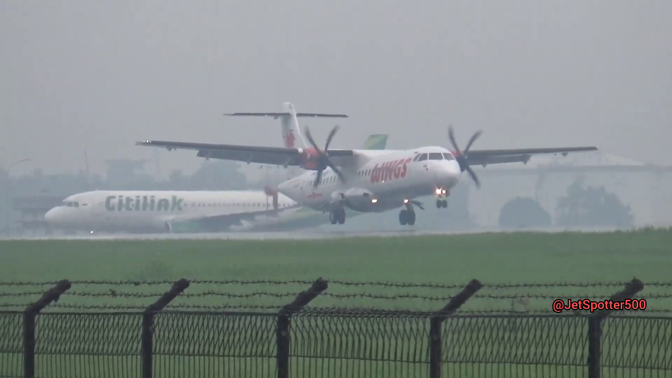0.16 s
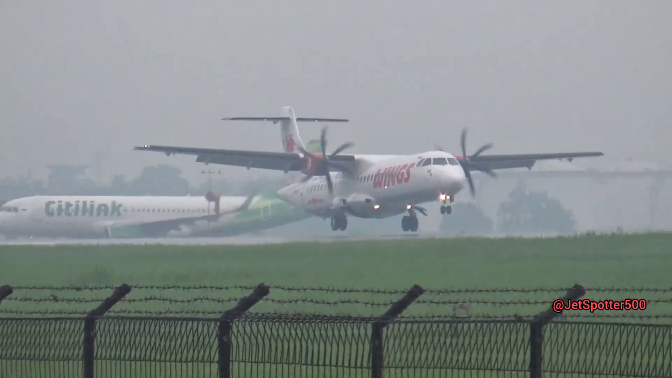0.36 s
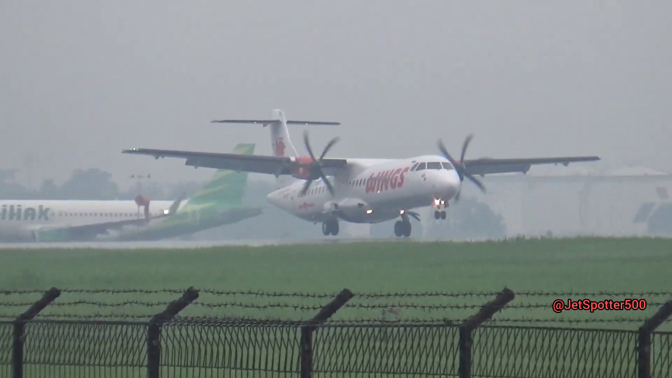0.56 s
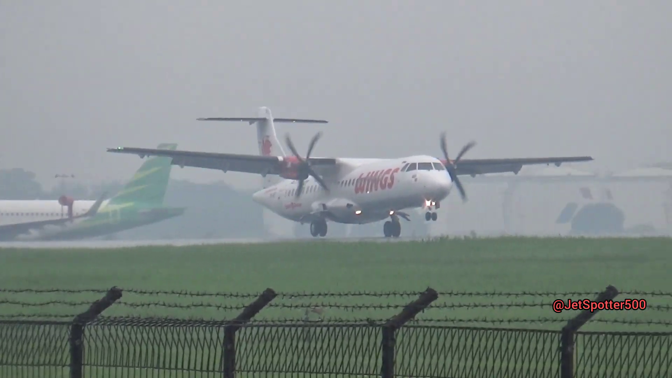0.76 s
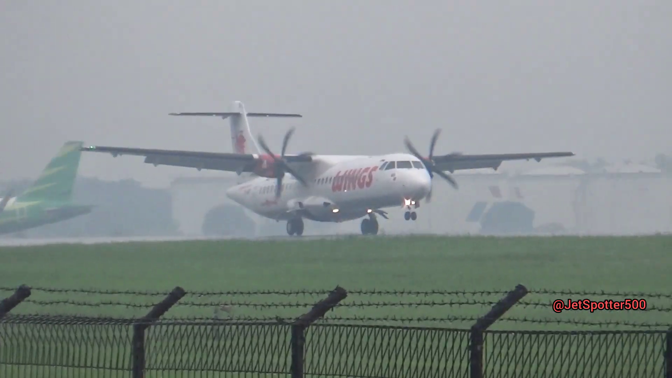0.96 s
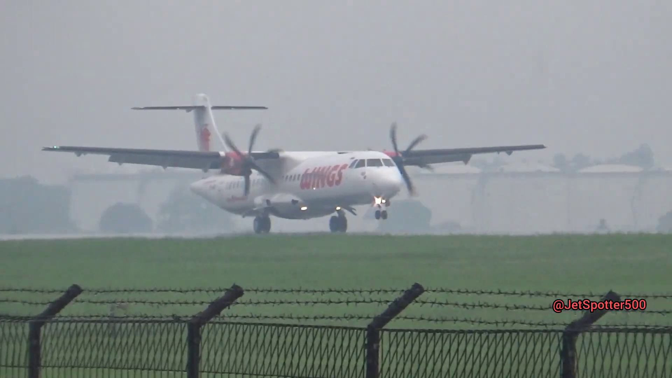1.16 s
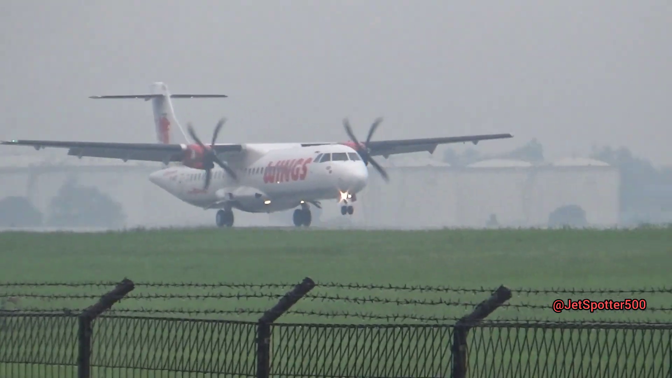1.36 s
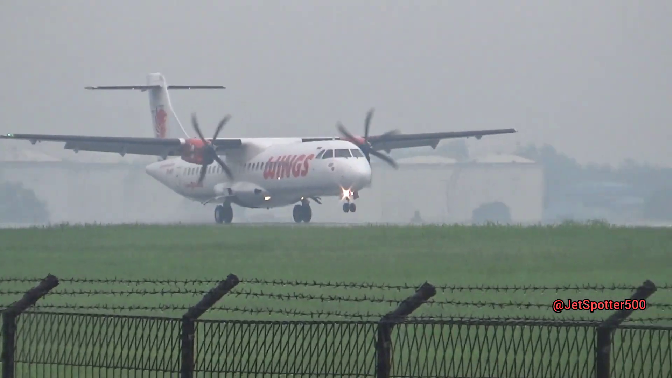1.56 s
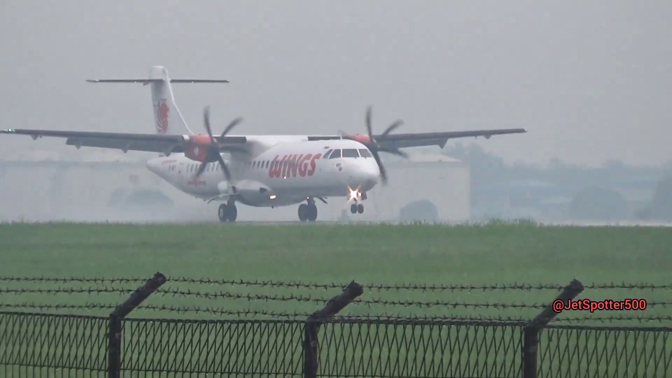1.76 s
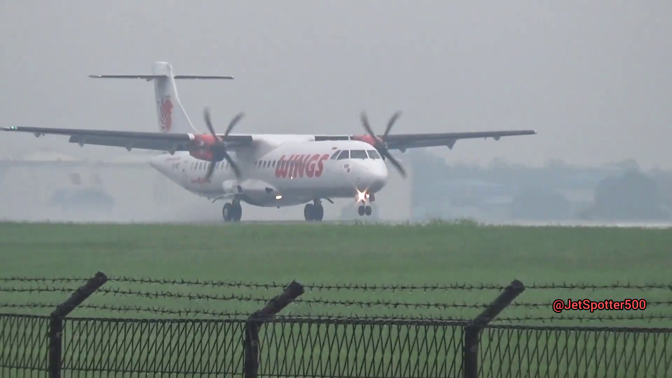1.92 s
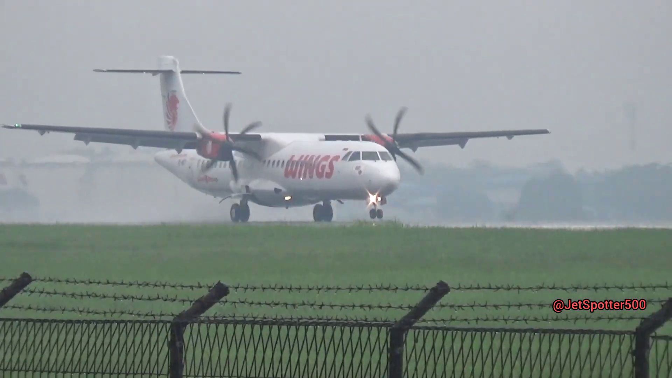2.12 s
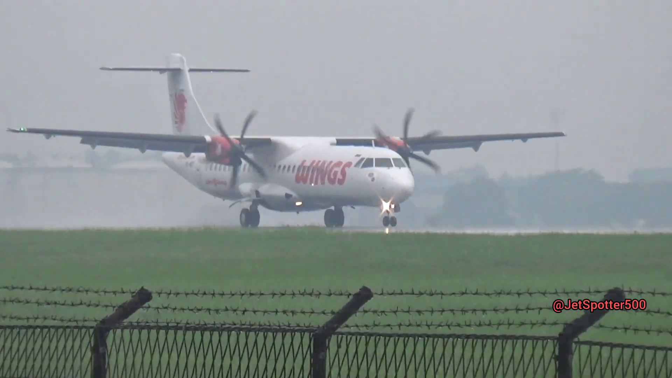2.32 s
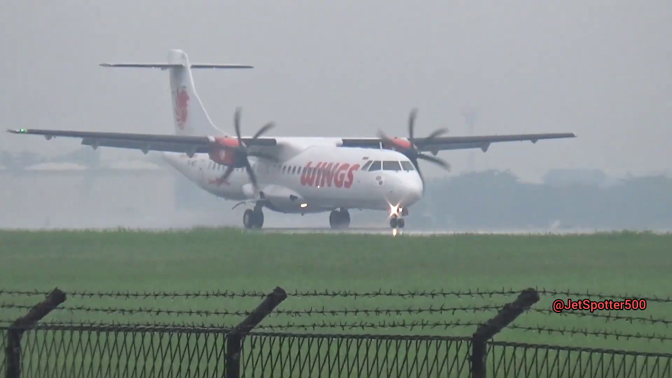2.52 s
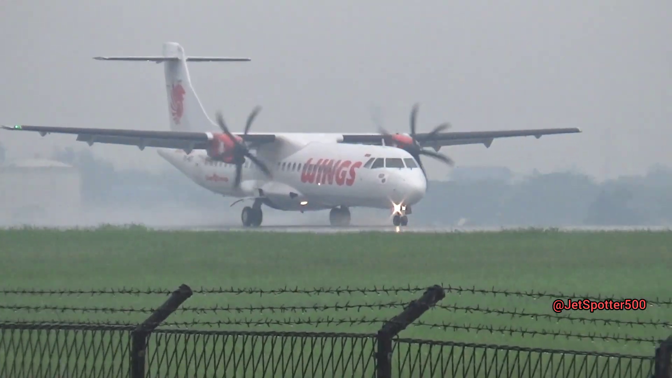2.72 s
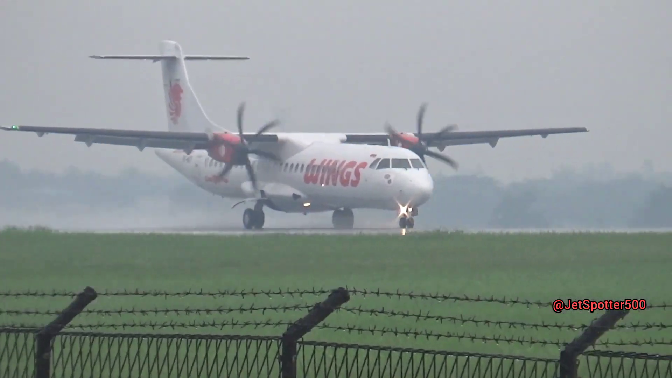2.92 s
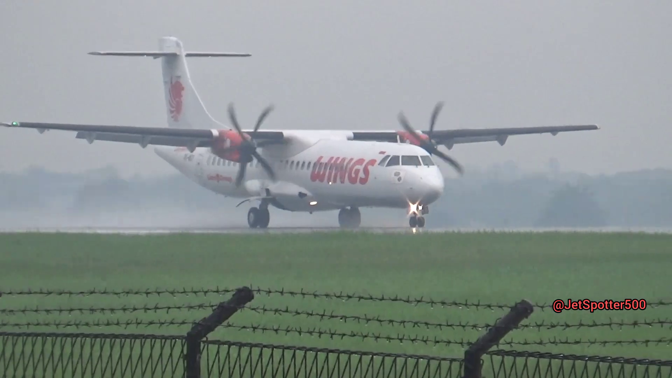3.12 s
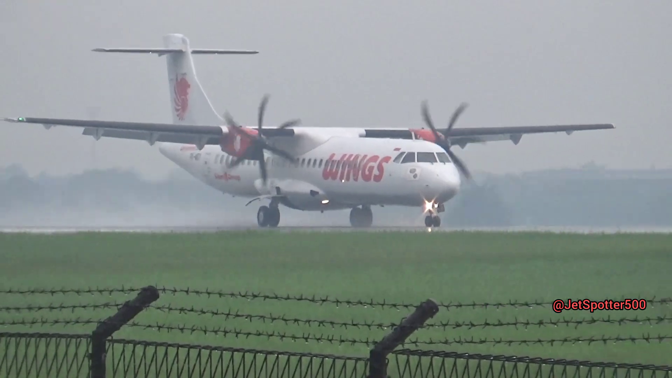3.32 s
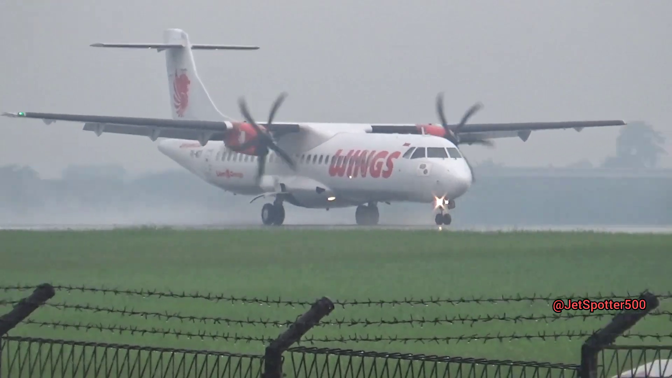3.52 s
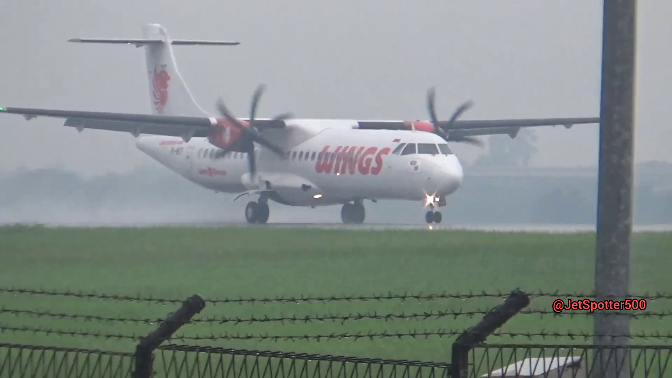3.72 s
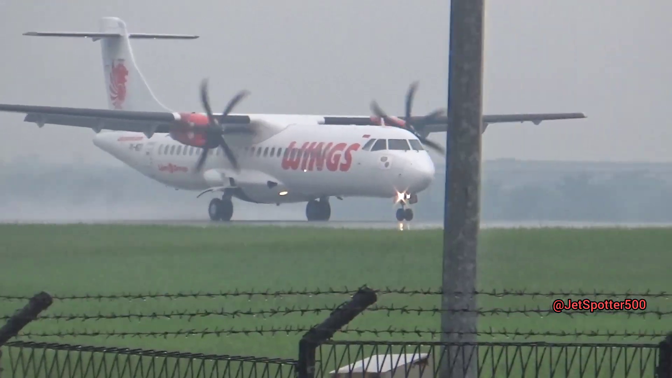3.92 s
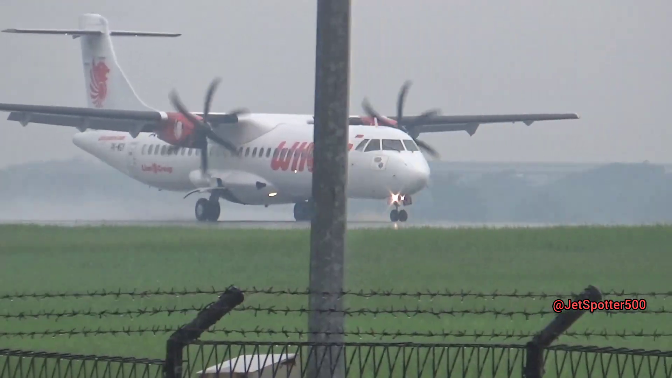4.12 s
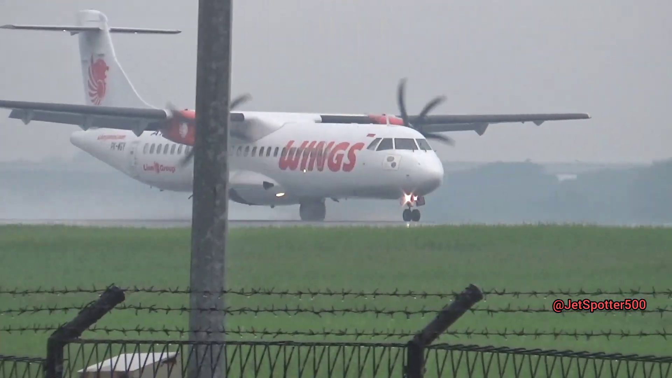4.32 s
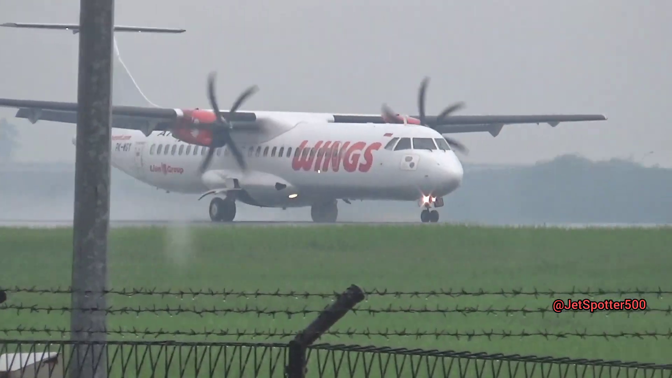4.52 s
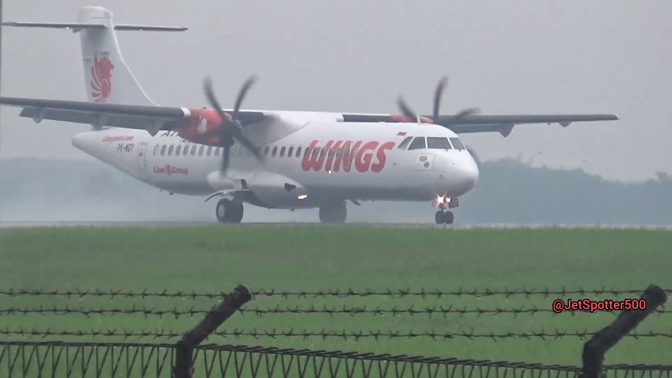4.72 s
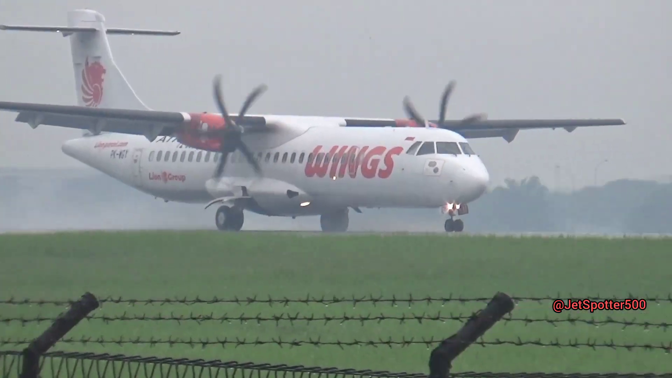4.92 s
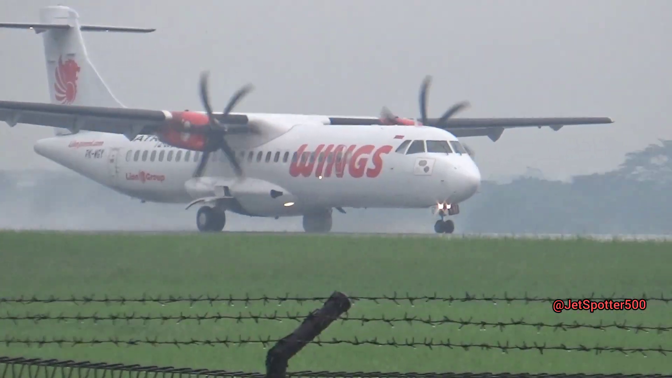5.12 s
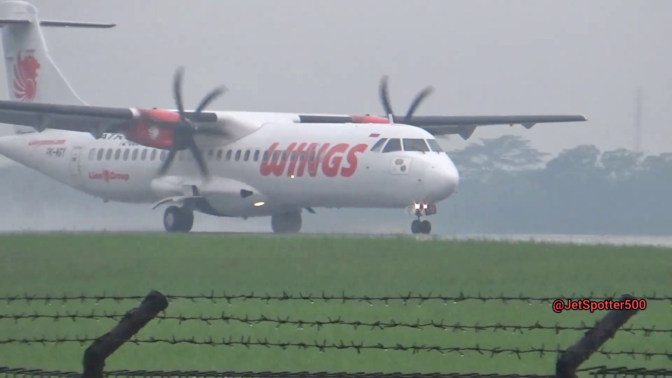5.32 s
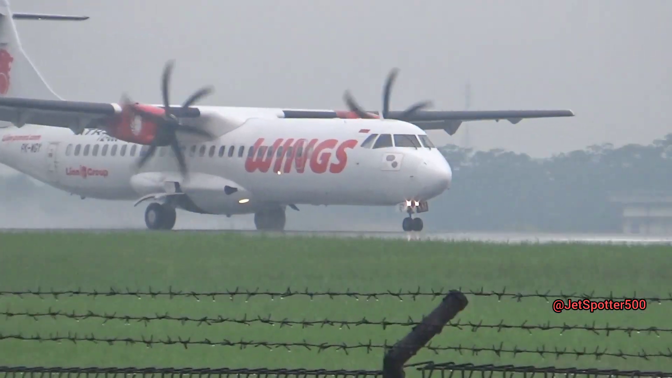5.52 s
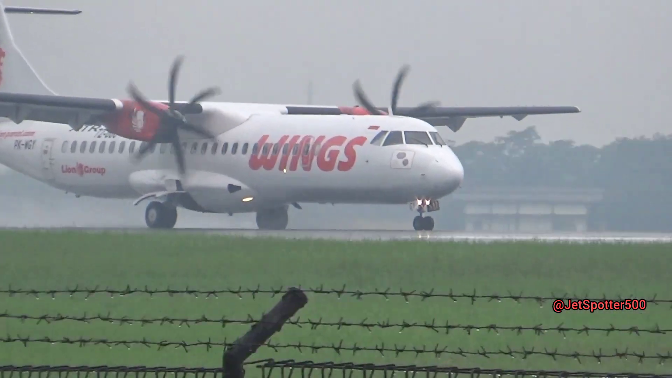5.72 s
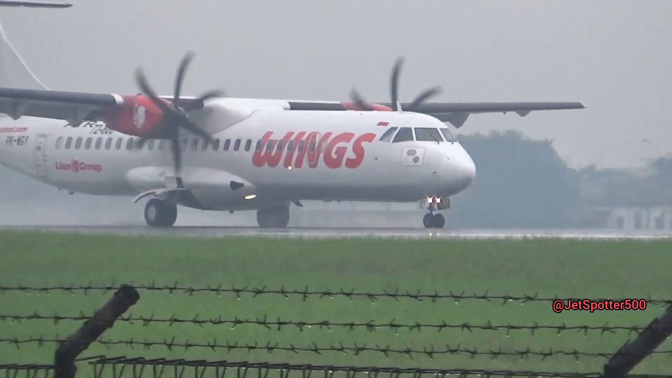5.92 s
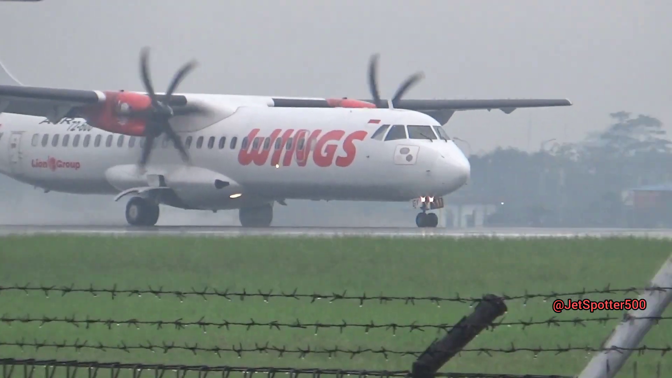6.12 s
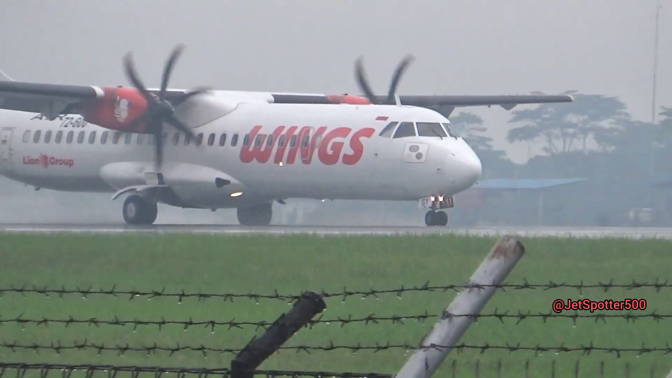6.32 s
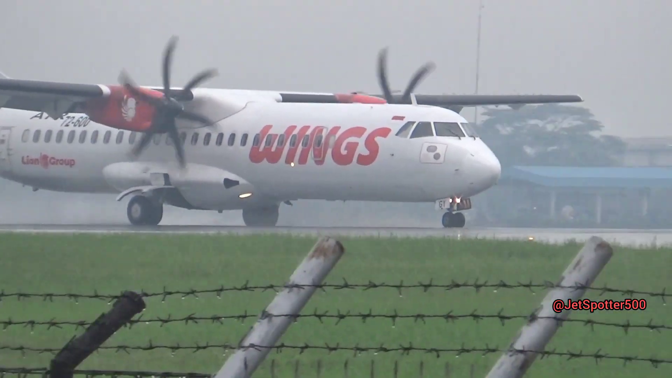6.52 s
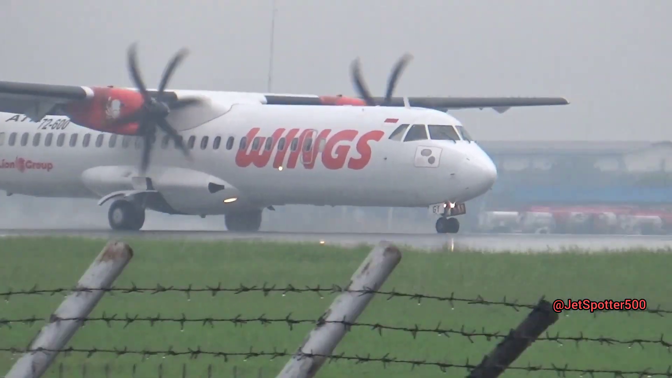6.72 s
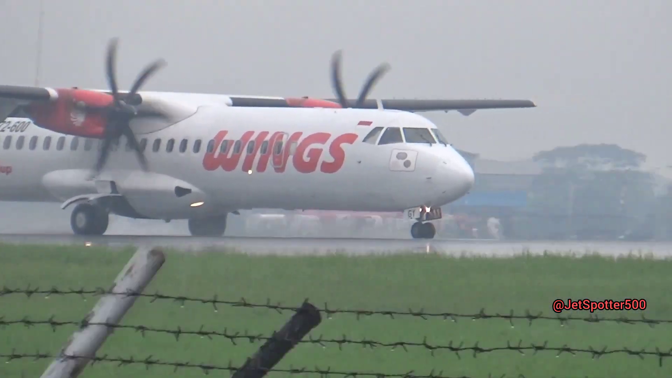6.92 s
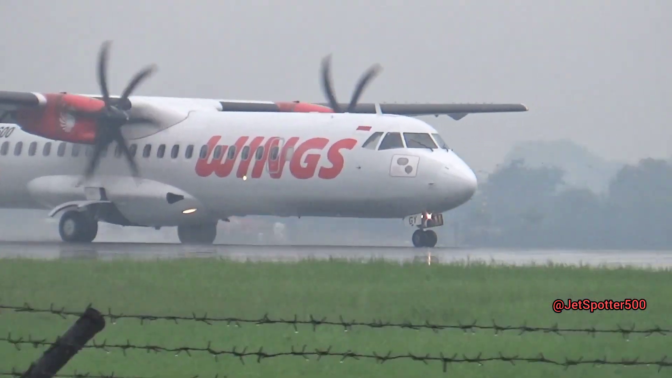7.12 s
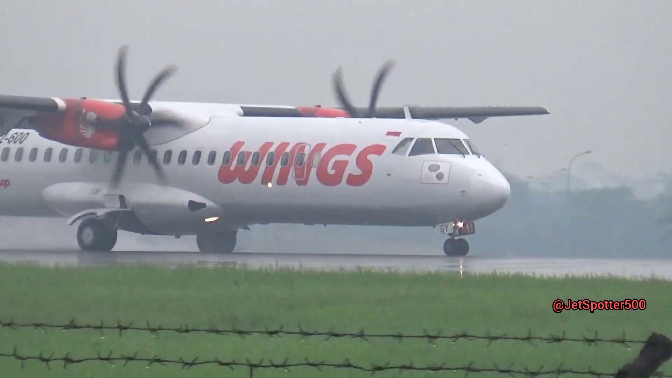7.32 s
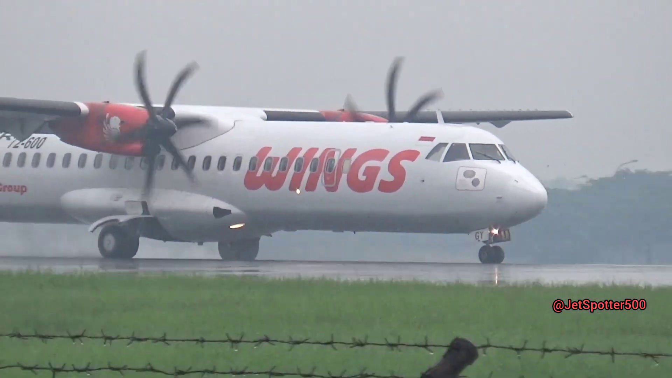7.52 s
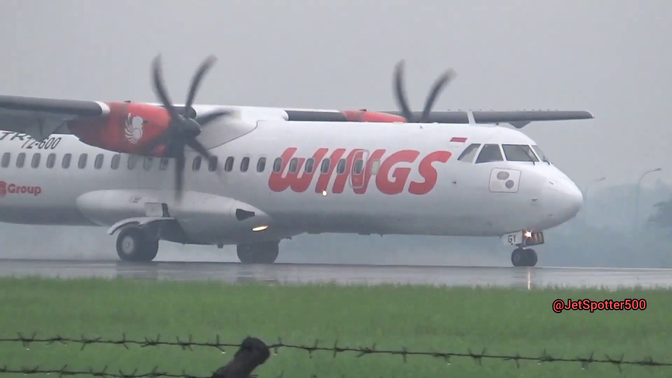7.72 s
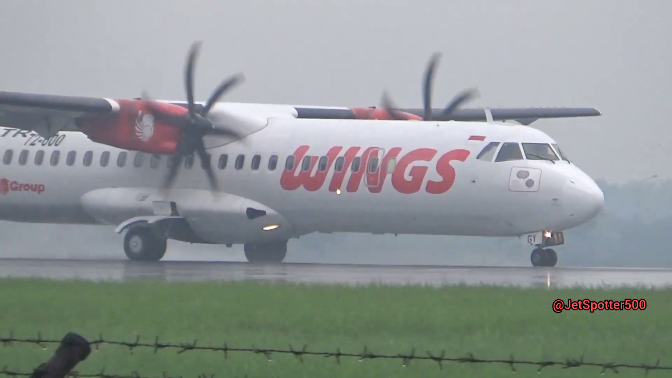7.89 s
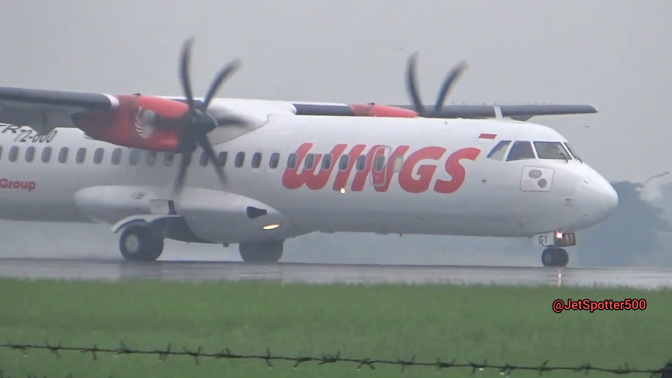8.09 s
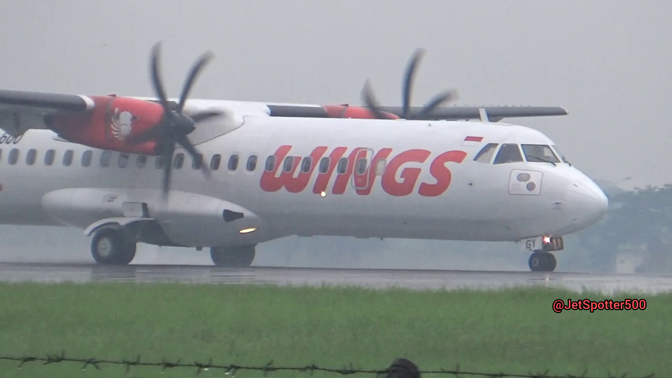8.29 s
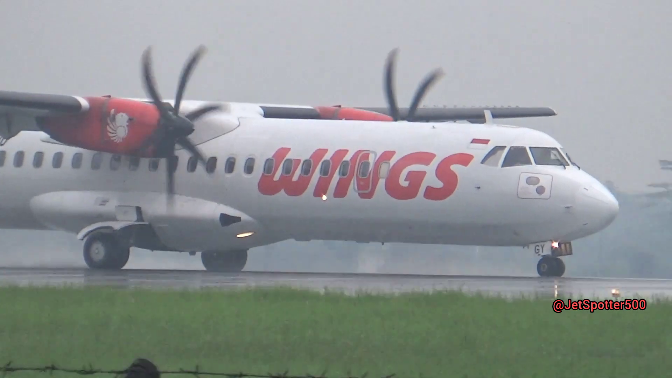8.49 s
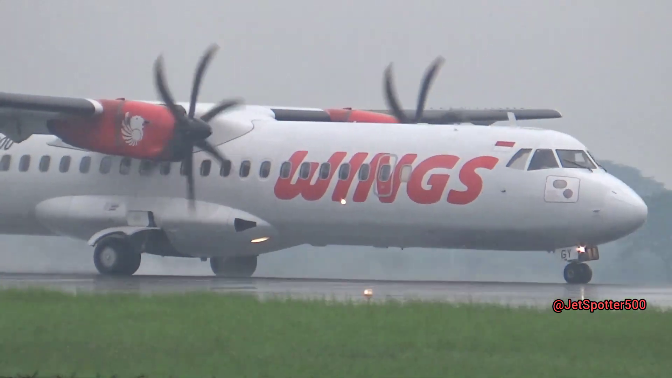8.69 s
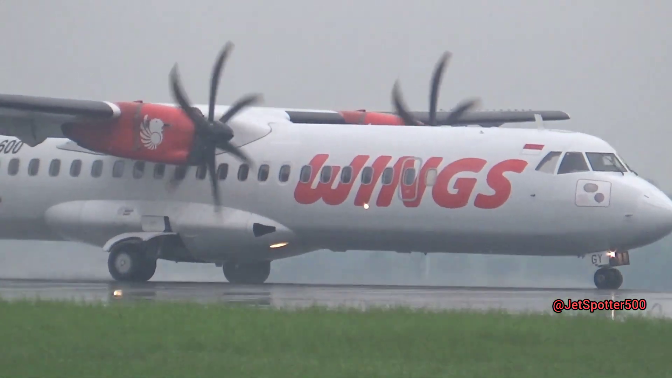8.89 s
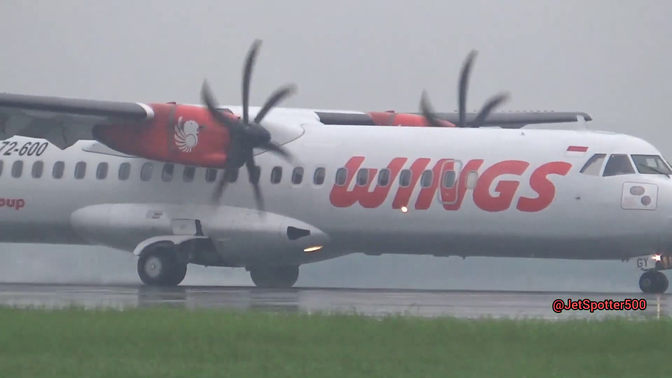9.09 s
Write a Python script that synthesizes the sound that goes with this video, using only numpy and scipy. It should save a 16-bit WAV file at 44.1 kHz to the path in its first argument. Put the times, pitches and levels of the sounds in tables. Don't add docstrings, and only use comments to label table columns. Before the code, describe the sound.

On a damp airfield with chirping crickets and drops tapping the camera, a landed propeller airliner rolls up, roaring, spraying and finally whining.

```python
import sys
import numpy as np
from scipy import signal
from scipy.fft import rfft, irfft, next_fast_len
from scipy.io import wavfile
from scipy.ndimage import uniform_filter1d, map_coordinates

SR = 44100
rng = np.random.default_rng(int(sys.argv[2]) if len(sys.argv) > 2 else 0)


def boost(x):
    u = np.asarray(x, float) / 20
    return 10 ** u


def transcribe(signal):
    frames = np.atleast_2d(signal).T
    limited = np.clip(frames, -1, 1)
    pcm = np.round(limited * 32767).astype(np.int16)
    wavfile.write(sys.argv[1], SR, pcm)


N = 403515
BLADE_HZ = 102.6

# frequency in Hz, likeness from 0 to 1.
ALIKE_NEAR = [(60, 0.975), (280, 0.985), (600, 0.975), (1300, 0.97), (2800, .955), (13000, 0.955)]


def unit(x):
    return x / np.sqrt(np.mean(x ** 2) + 1e-20)


def along(points, hz):
    f, v = np.transpose(points)
    return np.interp(np.log(hz + 1), np.log(f + 1), v)


def curves(rows):
    s, *cols = np.transpose(rows)
    return [np.interp(np.arange(N) / SR, s, c) for c in cols]


def wobble(rate):
    knots = rng.standard_normal(int(N * rate / SR) + 4)
    return map_coordinates(knots, [np.arange(N) * rate / SR])


def swells(rows):
    t = np.arange(N) / SR
    return sum(db * np.exp(-((t - s) / max(half, .005)) ** 2) for s, db, half in rows)


def filtered(x, response):
    m = next_fast_len(N + 8192)
    return irfft(rfft(x, m) * response(np.fft.rfftfreq(m, 1 / SR)), m)[..., :N]


def add(track, s, sound):
    track[round(s * SR):][:len(sound)] += sound


def rush(gain, alike, patchy_db):
    z = signal.stft(rng.standard_normal((2, N)), nperseg=512)[2]
    patches = uniform_filter1d(rng.standard_normal(z.shape[1:]), size=8, axis=0)
    patches = uniform_filter1d(patches, size=9, axis=1)
    steady = np.clip(np.arange(len(patches)) / 5, .15, 1)[:, None]
    pair = signal.istft(z * boost(patchy_db * steady * unit(patches)), nperseg=512)[1][:, :N]

    def mid_and_side(hz):
        turn = np.arccos(np.clip(along(alike, hz), -1, 1)) / 2
        return gain(hz) * [np.cos(turn), np.sin(turn)]

    mid, side = filtered(pair, mid_and_side)
    return unit(np.array([mid + side, mid - side]))


def field():
    # frequency in Hz, level in dB per Hz.
    air_spectrum = [(24, -32), (40, 6), (106, 5), (160, 0), (204, 3), (349, -8.5), (376, -12), (1300, -1.5),
                    (1970, -6), (3620, -10), (4400, -7.5), (5750, -11), (6490, -18), (9130, -11.5),
                    (13500, -22.5)]
    # frequency in Hz, likeness from 0 to 1.
    alike_air = [(60, .999), (110, 0.98), (200, 0.99), (520, 0.46), (1500, 0.86), (4400, 0.8),
                 (13000, 0.91)]
    # centre in Hz, width in Hz, level in dB.
    choirs = [
        (9130, 690, -66.5),
        (6200, 300, -74),
    ]

    def air_gain(hz):
        low_cut = hz ** 6 / (hz ** 6 + 50 ** 6)
        return boost(along(air_spectrum, hz)) * low_cut

    air = boost(-55.5 + 0.2 * wobble(2.5)) * rush(air_gain, alike_air, patchy_db=2.0)
    for c_hz, w_hz, db in choirs:
        choir = rush(lambda hz: 1 / (1 + ((hz - c_hz) / w_hz * 2) ** 2), ALIKE_NEAR, patchy_db=4.0)
        air += boost(db + 0.93 * wobble(3.95)) * choir
    return air


def note(db, from_hz, to_hz, length):
    u = np.linspace(0, 1, int(length * SR))
    glide_hz = from_hz + (to_hz - from_hz) * u
    return boost(db) * np.sin(np.pi * u) * np.sin(2 * np.pi * np.cumsum(glide_hz) / SR)


def birds():
    # start in seconds, peak in dB, start pitch in Hz, end pitch in Hz, length in seconds.
    bird_notes = [(.008, -50, 4280, 3340, 0.013), (0.048, -50, 4500, 5860, 0.023),
                  (.09, -56, 3700, 3100, .016), (.152, -51, 4220, 3500, .008), (0.17, -46, 3380, 4180, .02),
                  (.21, -56, 2900, 3500, .01), (0.219, -49, 3940, 2920, .022),
                  (0.29, -49, 4000, 3400, 0.015), (0.315, -49, 4060, 2450, .028),
                  (.37, -51, 3820, 2860, 0.018), (1.585, -52, 4400, 4700, 0.024),
                  (1.748, -51, 5040, 4520, 0.036), (1.786, -60, 4100, 3500, 0.011),
                  (1.825, -58, 6840, 7000, .012), (1.91, -55, 3500, 3800, .01),
                  (2.0, -52, 4100, 3500, .018), (2.078, -51, 5070, 5600, .022),
                  (2.2, -49, 3400, 4000, 0.016), (2.32, -49.5, 4140, 3500, .014),
                  (2.523, -41, 2450, 2780, 0.023)]
    out = np.zeros(N)
    for s, *voice in bird_notes:
        add(out, s, note(*voice))
    return out * boost(1.6 * wobble(300))


def crickets(out):
    # start in seconds, peak in dB.
    triplets = [(.15, -60), (.385, -59), (.618, -58), (.852, -58), (1.085, -59), (1.32, -57), (1.555, -57),
                (1.79, -62)]
    # start in seconds, level in dB, length in seconds.
    katydid = [(1.52, -62, .11), (1.81, -63, .15), (2.16, -63, .09)]
    cricket_hz, stroke_gap_s = 5100, .0385
    rasp = wobble(950) * boost(3 * wobble(60))
    buzz = wobble(350)
    for s, db in triplets:
        neighbours = note(db - 1.5, 5400, 5350, .14)
        add(out, s - .01, neighbours * rasp[round(s * SR):][:int(.14 * SR)])
        for k in range(3):
            stroke_db = db - 2 + rng.normal(0, 1.5)
            stroke = note(stroke_db, *cricket_hz + rng.normal(0, 90, size=2), .009)
            add(out, s + k * stroke_gap_s - .004, stroke)
    for s, db, length in katydid:
        add(out, s, note(db, 7600, 7600, length) * buzz[round(s * SR):][:int(length * SR)])


def wildlife():
    out = birds()
    crickets(out)
    t = np.arange(SR // 5) / SR
    echoes = rng.standard_normal((2, len(t))) * boost(-60 * t / .15)
    tail = echoes[0] + .15 * echoes[1] * [[1], [-1]]
    tail = tail / np.linalg.norm(tail[0])
    wet = signal.fftconvolve(out[None], tail, axes=1)[:, :N]
    return out * boost([[.3], [-.3]]) + boost(-4.5) * wet


def drizzle():
    # time in seconds, tick in dB, knock in dB.
    drops = [(0.4514, -43, -52), (0.612, -39, -43.5), (0.6714, -48, -52), (0.9397, -50, -47),
             (0.9592, -42, -53), (1.1293, -47, -50), (1.227, -48, -48), (1.2744, -49, -47),
             (1.4396, -44, -50), (1.528, -47, -49), (1.617, -48, -47), (2.4074, -42, -44),
             (2.4438, -40, -39), (2.7257, -43, -46), (3.1093, -39, -49), (3.3397, -47, -54),
             (3.5289, -46, -48), (3.9894, -42, -50), (4.129, -41, -37), (4.2996, -36, -45)]
    ticks, knocks, t = np.zeros(N), np.zeros(N), np.arange(600) / SR
    ring = 0.21 * boost(-60 * t / 0.013) * np.sin(2 * np.pi * 2300 * t)
    knock = boost(-60 * t / 0.0011) + ring
    for s, tick_db, knock_db in drops:
        add(ticks, s + .0007, boost(tick_db - 60 * t / 0.013) * rng.standard_normal(len(t)))
        splatter = .3 * boost(-60 * t / 0.036) * rng.standard_normal(len(t))
        add(knocks, s + .0007, -boost(knock_db + 13.5) * (knock + splatter))
    bright = signal.butter(3, [7500, 11500], "bandpass", fs=SR, output="sos")
    dull = signal.butter(2, [800, 2900], "bandpass", fs=SR, output="sos")
    return signal.sosfilt(bright, ticks) + signal.sosfilt(dull, knocks)


def hum():
    # frequency in Hz, level in dB over the hum noise.
    hum_tones = [
        (99, -14.5),
        (139, -12),
        (245, -4.5),
    ]
    t = np.arange(N) / SR
    return sum(boost(db) * (0.32 + 0.84 * wobble(22)) * np.sin(2 * np.pi * hz * t) for hz, db in hum_tones)


def whine():
    # time in seconds, frequency in Hz.
    spool = [(7.3, 5300), (7.5, 5350), (7.85, 5470), (8.3, 5530), (8.6, 5570), (9.15, 5590)]
    # time in seconds, level in dB.
    whine_db = [(7.3, -37), (7.8, -34.5), (8.3, -30.5), (8.7, -29), (9.15, -22.5)]
    # time in seconds, lift in dB, half length in seconds.
    flares = [(7.5, 12.5, 0.035), (7.79, 3, .02), (7.9, 13, 0.039), (8.17, 9, 0.063), (8.34, 10, 0.015),
              (8.51, 9, 0.035), (8.62, 7, 0.036), (8.78, 2, .06), (8.93, 2.5, 0.044)]
    (hz,), (db,) = curves(spool), curves(whine_db)
    t = np.arange(N) / SR
    start = np.clip((t - whine_db[0][0]) / 0.17, 0, 1)
    turn = 2 * np.pi * np.cumsum(hz + 5 * wobble(25)) / SR
    tones = boost(-8) * (1.4 + 0.35 * wobble(25)) * np.sin(turn)
    for side in (-1, 1):
        tones += boost(-10.5) * wobble(30) * np.sin(turn + side * 2 * np.pi * BLADE_HZ * t)
    haystack = boost(-2.5) * wobble(800) * np.sin(turn)
    octave = boost(-15.5) * wobble(900) * np.sin(2 * turn)
    over = boost(db + swells(flares) + 32.0)
    return start * boost(-33.5 + np.array([[.6], [-.6]])) * over * (tones + haystack + octave)


def part(hz, count):
    # frequency in Hz, level in dB per Hz.
    near_spectrum = [(15, -71), (25, -41), (101, -39), (138, -19), (289, -21.5), (489, -6.5), (850, -2.5),
                     (1230, -4), (1870, -5), (4230, -13.5), (5660, -13), (7170, -16), (9570, -17.5),
                     (11500, -33), (13500, -44.5)]
    edges_hz = [42, 340, 800, 1700, 2700, 3650, 7000, 10500, 17000]

    def above(edge_hz):
        return np.clip(.5 + 4 * np.log2((hz + 1) / edge_hz), 0, 1)

    share = above(edges_hz[count]) - above(edges_hz[count + 1])
    echo = .19 / (1 + (hz / 3300) ** 4) * np.exp(-2j * np.pi * hz / 466)
    return np.sqrt(share) * boost(along(near_spectrum, hz)) * (1 + echo)


def ground(x):
    # time in seconds, centre in Hz, change in dB.
    high_dip = [(0, 4360, -5), (3, 4400, 5), (4.5, 3850, -1), (6.3, 3620, -1), (7.2, 4800, -1),
                (9.15, 4730, -2.5)]
    mid_dip = [(.3, 1750, -4), (1.3, 1650, -7), (1.7, 1650, -6), (2.1, 2310, 2.5), (3.2, 2400, 1.5),
               (3.7, 2440, -2), (4.6, 2300, -3), (5, 1840, -4.5), (6.4, 1620, -3.5), (7, 1650, 0)]
    low_dip = [(0, 201, 9), (4, 204, -14), (6.3, 188, -7.5), (7.2, 195, -5), (9.15, 200, 5.5)]
    brief_lift = [(1.0, 2400, .1), (1.08, 2400, 5), (1.17, 2550, 4), (1.27, 2500, 6), (1.38, 3150, 6),
                  (1.48, 3250, 2), (2.22, 2300, 0), (2.33, 2300, 3), (2.52, 2300, 2), (2.65, 2200, 1),
                  (4.05, 1950, -1), (4.13, 1950, 5), (4.2, 1900, -1), (5.15, 3000, 0.5), (5.28, 3000, 3.5),
                  (5.4, 3000, 0.05)]
    hz, t, z = signal.stft(x, SR, nperseg=1024)
    for band, octaves in ((high_dip, .11), (mid_dip, .14), (low_dip, .16), (brief_lift, .09)):
        s, centre_hz, db = np.transpose(band)
        away = np.log2((hz[:, None] + 1) / np.interp(t, s, centre_hz)) / octaves
        z = z * boost(np.interp(t, s, db) * np.exp(-away ** 2 / 2))
    return signal.istft(z, SR, nperseg=1024)[1][:, :N]


def bursts():
    # time in seconds, change in dB, half length in seconds.
    puddles = [(3.82, 4, 0.057), (4.3, 0, .05), (4.8, -2, 0.054), (4.94, 0.5, .03), (5.02, 3.5, 0.057),
               (5.3, 6.5, 0.11), (5.74, 4, 0.056), (6.04, 1, 0.06), (6.19, 1.5, 0.022), (6.28, 3.5, 0.036),
               (6.5, 2.5, 0.059), (6.74, 5, 0.061), (6.88, 4.5, 0.071), (7.29, 4, 0.034),
               (7.52, 4.5, 0.022), (7.85, 3.5, 0.082), (7.95, 5.5, 0.0094), (8.08, 4.5, 0.075),
               (6.17, 0.5, .08), (7.15, 0, .06), (7.45, 1, .05), (8.47, 3.5, 0.036), (8.6, 4, .03),
               (8.82, 2, 0.012), (9.0, 2, .03)]
    core_gusts = [(.95, 0.5, .2), (1.3, 1, 0.18), (1.65, -4.5, 0.13), (1.96, 3.5, 0.088),
                  (2.397, 7.5, 0.13), (2.7, 1.5, 0.16), (3.45, 0, 0.16), (4.13, 1.5, .06), (4.7, 0.5, 0.19),
                  (5.07, 2, 0.059), (5.53, -4, .08), (5.945, 2, 0.045), (6.27, 1.5, 0.037),
                  (6.78, 1.5, .03), (7.352, 2, 0.046), (7.626, 1, 0.12), (7.9, 1, 0.16), (8.204, 2.5, .1),
                  (8.6, 0.5, 0.041), (8.77, 1, 0.023), (8.92, 0, 0.037), (9.12, -3.5, 0.11)]
    blade_bites = [(1.76, 3, .08), (4.6, -3, 0.059), (5.25, -1, 0.091), (5.66, -2.5, 0.068),
                   (6.39, 5, 0.065), (6.7, -2, .04), (6.83, 4.5, 0.056), (7.0, 1.5, .06),
                   (7.303, -1.5, 0.1), (7.542, 4, 0.026), (7.9, -1, 0.19), (8.27, 1.5, 0.098),
                   (8.39, -5, 0.058), (8.463, 7, 0.039), (8.625, -5, .025), (8.665, 5, 0.017),
                   (8.72, -3, .025), (8.1, 3, 0.054), (8.556, 0, 0.031), (8.82, 2.5, 0.055),
                   (9.09, -2, 0.035)]
    exhaust_gusts = [(1.35, -1, .08), (1.702, -2.5, .12), (4.0, -0.5, .1), (4.35, -2, .08),
                     (4.62, 2.5, 0.11), (4.9, -2.5, .1), (6.607, -1.5, 0.12), (6.9, -1, .06),
                     (7.2, -1, 0.086), (7.5, -1, .08), (8.05, -0.5, .1), (8.55, 0, 0.11),
                     (7.8, -0.5, 0.058), (9.003, -1.5, .1)]
    splash = [.01, .01, .1, 0.31, 0.52, 0.66, 0.88, .8]
    windy = [.01, .01, .05, 0.82, 0.57, .05, .01, .01]
    biting = [0.28, 0.47, 0.09, .05, .01, .01, .01, .01]
    blowing = [.01, 0.18, 0.68, .1, .01, .01, .01, .01]
    events_db = [swells(rows) for rows in (puddles, core_gusts, blade_bites, exhaust_gusts)]
    return np.transpose([splash, windy, biting, blowing]) @ events_db


def part_levels():
    # time in seconds, level in dB.
    engines = [(0, -52), (.92, -40.5), (1.5, -34), (2.25, -34), (2.68, -29), (3.2, -36.5), (3.5, -35.5),
               (3.77, -28), (4.28, -25), (4.79, -19), (5.12, -13.5), (5.85, -13), (6.0, -11), (6.45, -8),
               (6.85, -3.5), (7.4, -0.5), (8.4, -0.5), (9.15, 2)]
    # time in seconds, level in dB.
    blade_load = [(0, -44.5), (1.2, -42), (2, -37), (4.1, -35.5), (4.4, -32.5), (4.76, -17.5),
                  (5.25, -12.5), (6.1, -13), (6.4, -9), (6.78, -6.5), (6.9, -4), (7.5, 0), (9.15, 0.5)]
    # time in seconds, level in dB.
    spray = [(0, -36.5), (.94, -34.5), (2.83, -31), (3.3, -31), (4.25, -20.5), (4.4, -22), (4.7, -20.5),
             (4.87, -16), (4.95, -9), (5.6, -11), (5.9, -7), (6.0, -2.5), (6.6, -3.5), (7, -1.5), (9.15, 0)]
    # level alongside in dB, share of engines, share of blades, share of spray,
    # gain in dB per second as the wet air between thins.
    parts = [
        (-42, .02, 0.52, 0.16, 0.07),
        (-21, 0.022, 0.98, .01, 0),
        (-19, 0.98, .01, .01, -0.01),
        (-22.5, 0.47, .01, 0.48, 0.06),
        (-28.5, 0.082, .01, 0.89, -0.5),
        (-26.5, .01, .01, 1.0, -0.09),
        (-32.5, 0.1, .01, 0.85, 0.81),
        (-41.5, .01, .01, 0.69, 3),
    ]
    thins_from_s, alongside_s = 5, 9
    closing = np.clip(np.arange(N) / SR, thins_from_s, None) - alongside_s
    drives = np.array(curves(engines) + curves(blade_load) + curves(spray) + [closing])
    flutter_db = [1.9, 0.34, 0.15, 0.62, 0.96, 0.42, 0.67, 0.88]
    bursts_db = bursts()
    levels_db = []
    for k, (db, *shares) in enumerate(parts):
        flutter = flutter_db[k] * wobble(17) * boost(0.36 * drives[0])
        levels_db.append(db + np.dot(shares, drives) + bursts_db[k] + flutter)
    return levels_db


def aircraft():
    # time in seconds, left minus right in dB.
    lean = [(0, .1), (6, .4), (7.3, .85), (9.15, .6)]
    patchy_db = [0.31, 0.64, 0.3, 0.67, 0.65, 0.53, 0.54, 1.1]
    gust_db = [.1, 0.29, 0.21, 0.1, 0.17, 0.78, 0.76, 0.88]
    gating = [.02, 0.1, 0.08, 0.08, 0.07, 0.07, 0.08, 0.08]
    levels_db = part_levels()
    gust = wobble(15) + .5 * wobble(35)
    blades = np.cos(2 * np.pi * np.cumsum(BLADE_HZ + 2.72 * wobble(2.3)) / SR)
    out = whine() + boost(levels_db[0]) * hum()
    for k, db in enumerate(levels_db):
        noise = rush(lambda hz: part(hz, count=k), ALIKE_NEAR, patchy_db[k])
        out = out + boost(db + gust_db[k] * gust) * (1 + gating[k] * blades) * noise
    lean_db, = curves(lean)
    return ground(out) * boost([lean_db / 2, -lean_db / 2])


def scene():
    return aircraft() + field() + wildlife() + drizzle() * boost([[1.5], [-1.5]])


def top_shut(x):
    # time in seconds, half length in seconds, upper limit in Hz.
    top_back = [(6.1, .02, 14200), (6.18, .012, 15700), (6.25, .012, 14500), (6.3, .018, 15700),
                (6.44, .016, 15700), (6.58, .026, 15200), (6.73, .014, 13700), (6.83, .012, 13700),
                (6.97, .012, 13700), (7.11, .012, 15700), (7.99, .012, 13700), (8.06, .014, 13700),
                (8.24, .014, 15100), (8.54, .025, 13700), (8.64, .04, 13700), (8.78, .012, 13700),
                (8.94, .012, 13500), (9.01, .016, 13800), (9.1, .03, 13700)]
    top_lost_s = 6.0
    hz, t, z = signal.stft(x, SR, nperseg=1024)
    ragged_hz = 13000 + 140 * wobble(25)[np.minimum(t * SR, N - 1).astype(int)]
    edge_hz = np.where(t < top_lost_s, SR, ragged_hz)
    for s, half, top_hz in top_back:
        edge_hz = np.where(np.abs(t - s) < half, top_hz, edge_hz)
    return signal.istft(z * (hz[:, None] < edge_hz), SR, nperseg=1024)[1][:, :N]


def narrowed(x, level):
    side = (x[0] - x[1]) / 2

    def above(db):
        return uniform_filter1d((level > boost(db)) * 1., size=1024)

    def band(low_hz, high_hz):
        return filtered(side, lambda hz: (hz > low_hz) & (hz < high_hz))

    lost = .8 * above(-33) * band(6350, SR)
    lost -= above(-33) * (wobble(30) > .5 + above(-19)) * band(6900, 8300)
    lost += 0.67 * (above(-40) - above(-19.0)) * band(-1, 450)
    lost += .97 * (1 - above(-20.0)) * band(-1, 170) * (1 - .67 * above(-41))
    lost += (.35 * above(-33) - .75 * above(-20.5)) * band(450, 1500)
    lost += above(-20.0) * band(-1, 60)
    return x - lost * [[1], [-1]]


def top_cut(x):
    return signal.sosfilt(signal.butter(12, 15720, fs=SR, output="sos"), x)


def record(dry):
    x = dry / (1 + np.abs(dry / 0.67) ** 4) ** (1 / 4)
    level = uniform_filter1d(np.abs(x[0]), size=4096)
    return top_cut(narrowed(top_shut(x), level))


dry = scene()
out = record(dry)
transcribe(out)
```